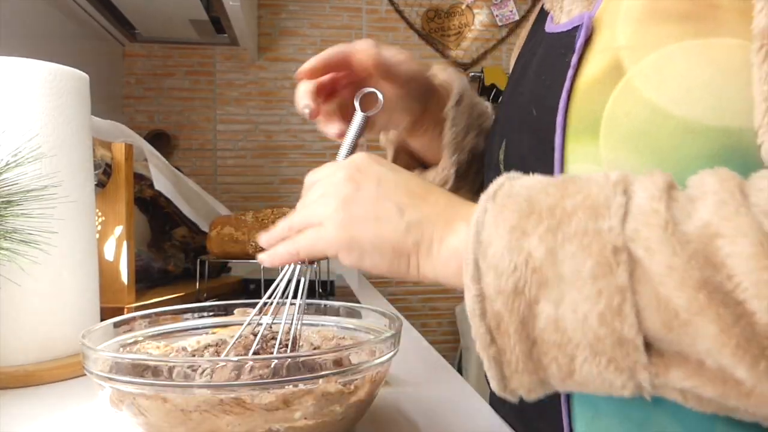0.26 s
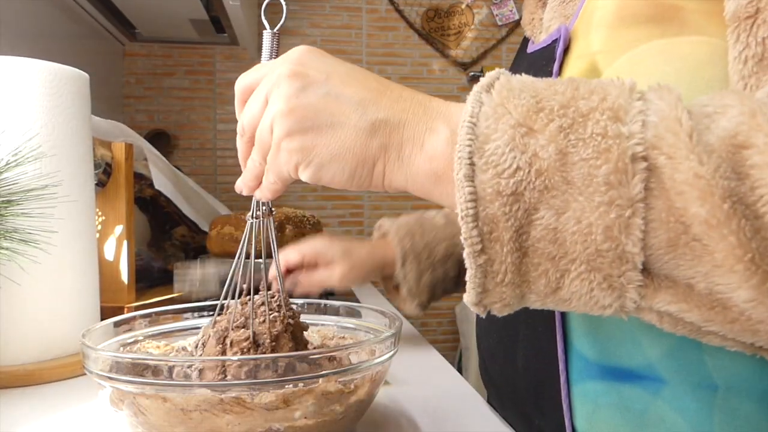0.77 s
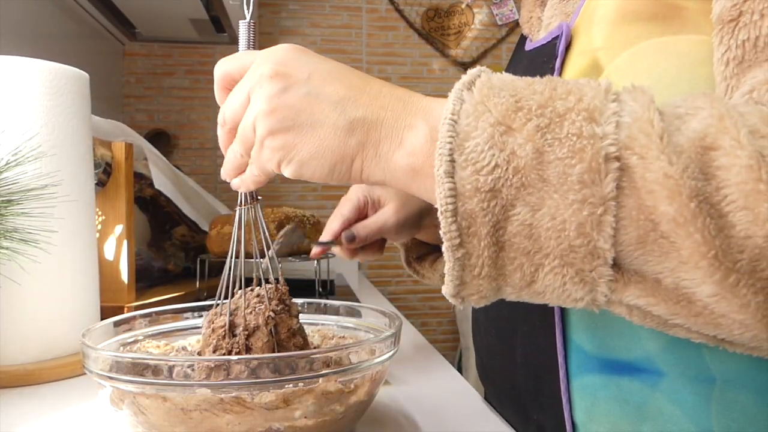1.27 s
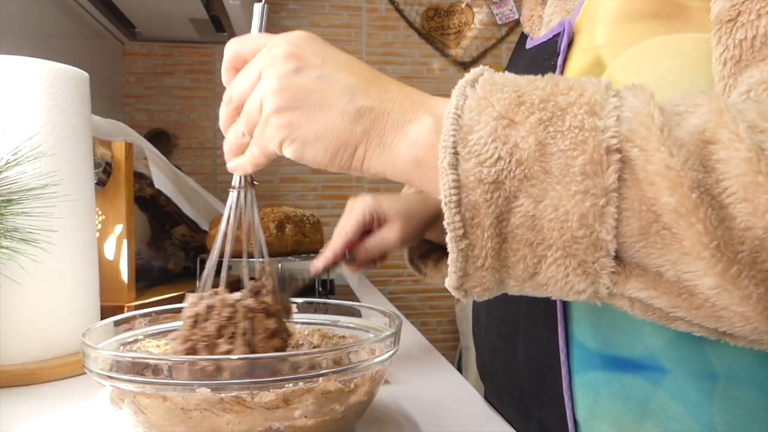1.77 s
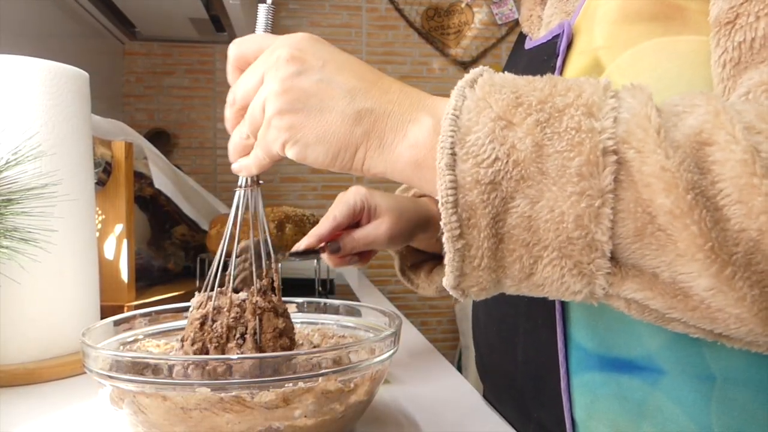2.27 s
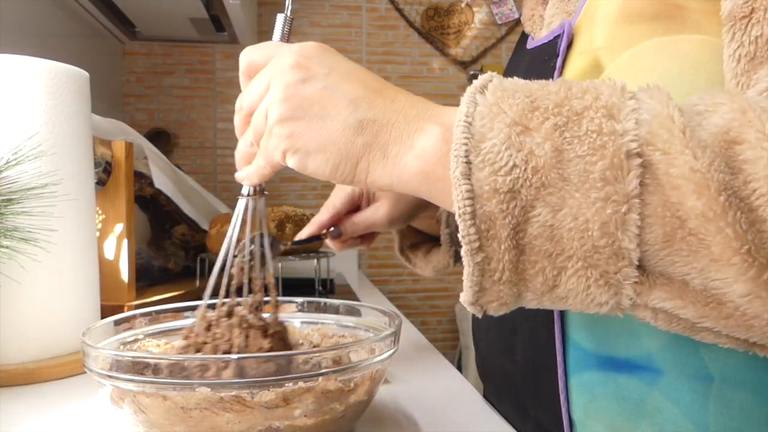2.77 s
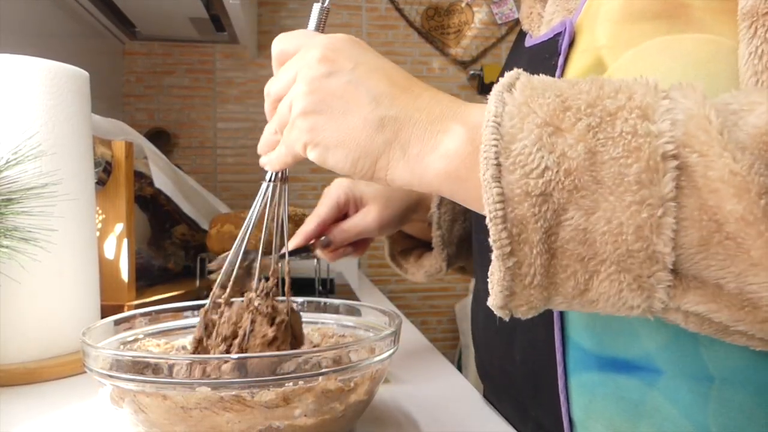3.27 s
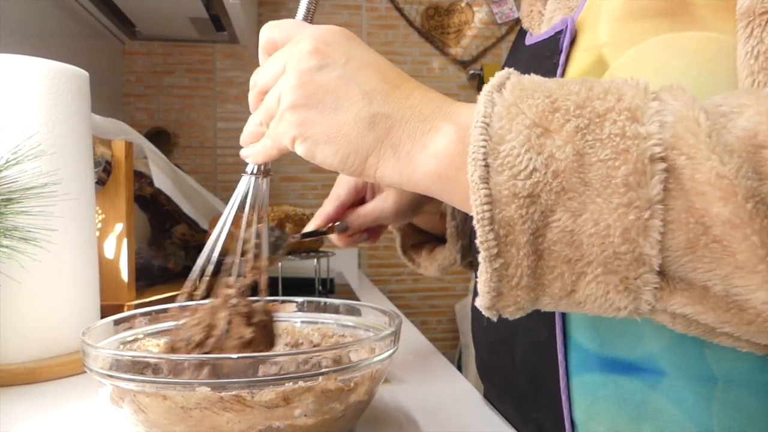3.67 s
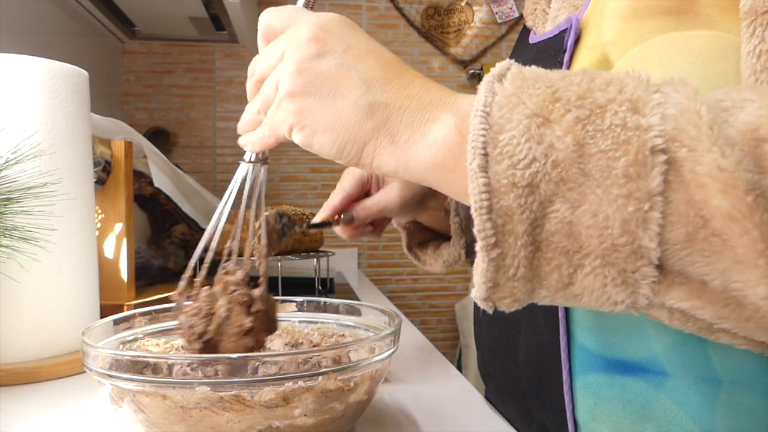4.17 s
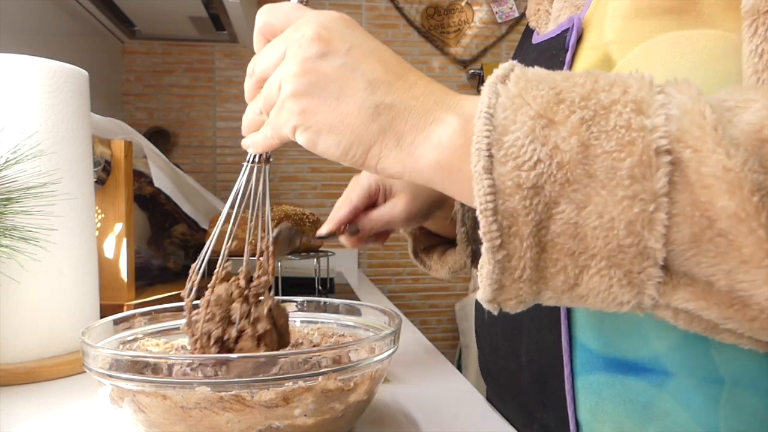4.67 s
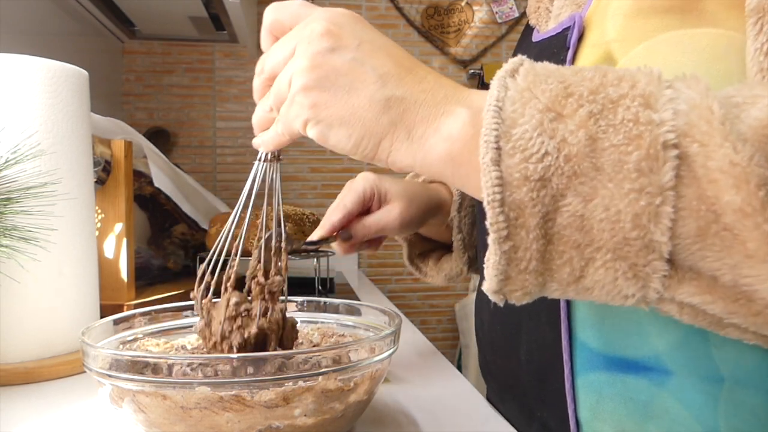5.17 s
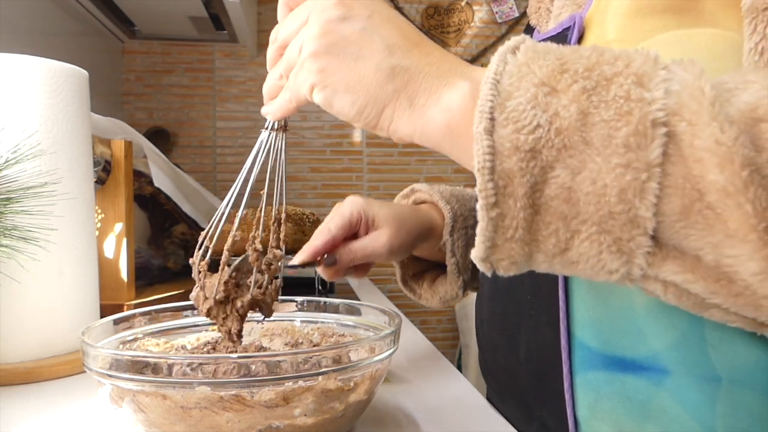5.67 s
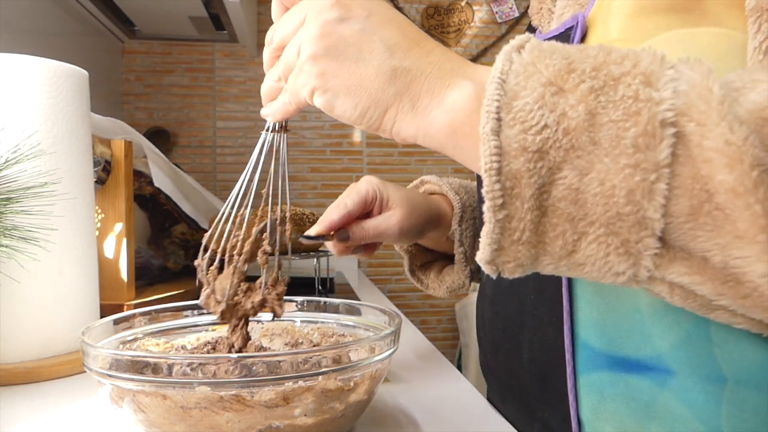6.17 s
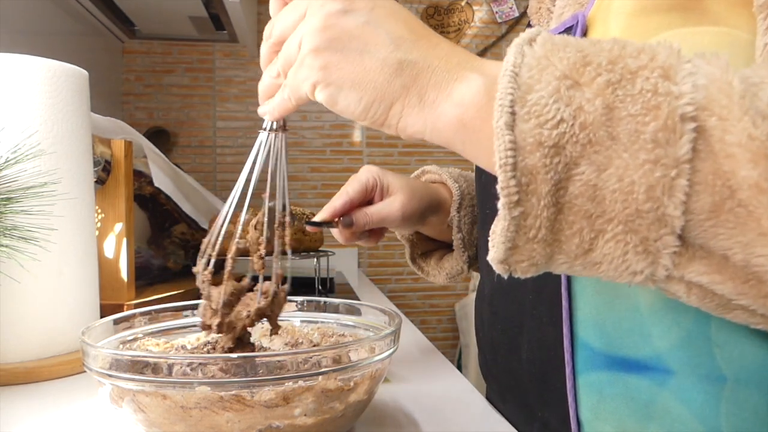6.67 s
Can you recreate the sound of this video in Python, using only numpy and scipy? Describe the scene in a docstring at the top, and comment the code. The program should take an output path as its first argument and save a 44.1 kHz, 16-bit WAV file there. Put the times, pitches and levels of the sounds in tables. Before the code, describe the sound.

A spoon scrapes thick batter off a wire whisk with light metallic ticks and one loud clink on a glass bowl, over a faint fan.

```python
"""Scraping batter off a whisk

In a small tiled kitchen, a spoon is picked up and works thick batter off a wire whisk.
The wires tick and scrape, the glass bowl bumps the counter, and once steel strikes the glass
with a loud clink. A fan hums behind it all, the walls echo, and a limiter holds the clink down."""
import sys
import numpy as np
from scipy import signal
from scipy.fft import rfft, irfft, next_fast_len
from scipy.io import wavfile
from scipy.ndimage import uniform_filter1d, minimum_filter1d, map_coordinates

SR = 44100
rng = np.random.default_rng(int(sys.argv[2]) if len(sys.argv) > 2 else 0)


def to_wav(sig):
    """Store sig (one row per channel, or 1-D mono) as 16-bit WAV at the path in sys.argv[1].

    Samples outside -1..1 are clipped; the rate is SR.
    """
    pcm = np.clip(np.atleast_2d(sig), -1, 1) * 32767
    pcm = np.round(pcm).astype(np.int16)
    wavfile.write(sys.argv[1], SR, pcm.T)  # frames by channels


N = 304731


def amp(db):
    """Turn decibels (dB) into a number to multiply a sound by."""
    return 10 ** (np.asarray(db) / 20)


def unit(x):
    """Scale a sound so that its average strength (rms) is 1."""
    return x / np.sqrt(np.mean(x ** 2) + 1e-20)


def along(points, hz):
    """Read between the rows of a (Hz, value) table, on a scale of pitch."""
    pitches, values = np.transpose(points)
    return np.interp(np.log(hz + 1), np.log(pitches + 1), values)


def peaks(modes, hz):
    """Level in dB of resonances, the pitches a thing rings at, each given as (Hz, width in Hz, dB)."""
    power = sum(np.abs(amp(2 * db) - 1) / (1 + (2 * (hz - centre) / width) ** 2)
                for centre, width, db in modes)
    return 10 * np.log10(1 + power)


def wobble(rate):
    """A smooth curve through `rate` random values a second."""
    return map_coordinates(rng.standard_normal(N // 100), [np.arange(N) * rate / SR], mode="wrap")


def filtered(x, response):
    """Multiply each frequency in a sound by response(hz)."""
    size = next_fast_len(N + SR // 2)
    return irfft(rfft(x, size) * response(np.fft.rfftfreq(size, 1 / SR)), size)[..., :N]


def struck(level, size=4096):
    """How an object rings after one tap, given its tone as level(hz) in dB."""
    cepstrum = irfft(np.log(amp(level(np.fft.rfftfreq(size, 1 / SR)))))
    cepstrum[1:size // 2] *= 2  # this folding puts all the ringing after the tap
    cepstrum[size // 2 + 1:] = 0
    response = irfft(np.exp(rfft(cepstrum)))
    return response / np.linalg.norm(response)


def add(track, s, sound):
    """Mix a sound into the track at s seconds."""
    part = track[round(s * SR):][:len(sound)]
    part += sound[:len(part)]


def rush(level, likeness):
    """Stereo noise with the tone level(hz) in dB; likeness says how alike the two ears are."""
    turn = lambda hz: np.arccos(np.clip(along(likeness, hz), -1, 1)) / 2
    shares = lambda hz: amp(level(hz)) * [np.cos(turn(hz)), np.sin(turn(hz))]
    mid, side = filtered(rng.standard_normal((2, N)), shares)
    return unit(np.array([mid + side, mid - side]))


def whine(centre_hz=2550, width_hz=50, db=-72.5, flicker_db=3.0):
    """A thin, faint whine wavers in the background."""
    band = rush(lambda hz: -20 * np.log10(1 + ((hz - centre_hz) / width_hz) ** 2), [(2000, 0.78)])
    return amp(db + flicker_db * wobble(16)) * band


# The motor's hum. Each row: pitch in Hz, level in dB, phase gap between the ears in radians.
MOTOR_TONES = [(48.6, -73.5, 1.5), (194.5, -65.5, 1.2), (244, -69, 1.2), (275, -69.5, .8),
               (472, -50.8, 1.25), (489, -68, .8), (602, -73, .8)]
# The tone of the rushing air and of the hiss. Each row: frequency in Hz, relative level in dB.
AIR_TONE = [(20, -28.5), (65, -20.5), (95, -4.5), (130, 2), (260, 2), (370, -4), (500, -2.5), (690, -4),
            (800, -1.5), (980, -3.5), (1070, -10.5), (1180, -6), (1310, -7), (1420, -14.5), (2450, -16.5),
            (5000, -50.5)]
HISS_TONE = [(200, -1), (1500, -13.5), (2200, 1.5), (2480, -8.5), (2750, 0), (3700, -5.5), (5500, -2.5),
             (7400, -5.5), (10000, -2.5), (13000, -5.5), (15700, -9.5)]
# Where the fan's housing rings. Each row: pitch in Hz, width in Hz, boost in dB.
HOUSING_MODES = [(442.4, 43, 9), (758.3, 7.3, 10), (952, 16, 7), (1147, 31, 12.5), (1256, 20, 12),
                 (1290, 20, 11.5)]
# How the air swells and sinks. Each row: time in seconds, level change in dB.
AIR_SWELL = [(0, 0), (1.8, 0.3), (3.8, 0), (5, -0.24), (6.2, -1.9), (6.9, -1.5)]
# How alike the air sounds in both ears. Each row: frequency in Hz, likeness from -1 to 1.
AIR_LIKENESS = [(60, -0.57), (130, -0.35), (290, -0.29), (640, 0.4), (1410, 0.44), (3100, -1), (6820, 0.77),
                (15000, 0.68)]

def fan(air_db=-50.0, hiss_db=-62, drift=0.12):
    """A slightly unsteady motor hums over a thin hiss and a rush of air that rings in the housing."""
    t, hum = np.arange(N) / SR, np.zeros((2, N))
    for hz, db, phase in MOTOR_TONES:
        angle = 2 * np.pi * hz * t + drift * (hz / 472) ** 2 * wobble(15)
        hum += np.sqrt(2) * amp(db + 1.1 * wobble(3.96)) * np.sin([angle + phase / 2, angle - phase / 2])
    swell_db = np.interp(t, *np.transpose(AIR_SWELL))
    air = rush(lambda hz: along(AIR_TONE, hz) + peaks(HOUSING_MODES, hz), AIR_LIKENESS)
    air *= amp(air_db + swell_db + .9 * wobble(4.5))
    hiss = amp(hiss_db) * rush(lambda hz: along(HISS_TONE, hz), [(2000, 0.31), (10000, 0.59)])
    return hum * amp([[-1.3], [1.3]]) + air * amp([[-.6], [.6]]) + hiss  # a little to the right


# Echoes off the counter, tiles and cupboards.
# Each row: delay to the left ear in seconds, delay to the right ear in seconds, relative level in dB.
ECHOES = [(.0012, 0.0014, -14.5), (.007, .007, -3.5), (.0082, .0085, -13), (0.0108, 0.012, -6.5),
          (0.0145, 0.014, -6.5)]
# How long the room rings. Each row: frequency in Hz, seconds to fade by 60 dB.
ROOM_FADE = [(150, 0.7), (1000, 0.75), (2800, 0.6), (4600, 0.54), (9000, 0.39), (15000, 0.28)]

def kitchen(x, walls_db, tail_db, side_db, build_s=0.0007):
    """The sound arrives directly, then as a few hard echoes and a soft tail, much alike in both ears."""
    hz, t, noise = signal.stft(rng.standard_normal((2, SR * 2 // 3)), SR, nperseg=256)
    decay = amp(-60 * t / along(ROOM_FADE, hz)[:, None]) * (1 - np.exp(-t / build_s))
    mid, side = signal.istft(noise * decay, SR, nperseg=256)[1]
    side = amp(side_db) * side
    room = amp(tail_db) * np.array([mid + side, mid - side]) / np.linalg.norm(mid)
    room[:, 0] += 1  # the direct sound
    for left, right, db in ECHOES:
        room[[0, 1], [round(left * SR), round(right * SR)]] += amp(db + walls_db)
    return signal.fftconvolve(x[None], room / np.linalg.norm(room[0]), axes=1)[:, :N]


# The bowl's bumps. Each row: start in seconds, level in dB, added brightness in dB per octave.
BOWL_BUMPS = [(0.486, -26, 0.5), (0.497, -32, 0.5), (2.411, -36, -4.5), (2.451, -45.5, -6.5),
              (3.063, -16.5, 6.5)]
# The counter's tone. Each row: frequency in Hz, relative level in dB.
COUNTER_TONE = [(50, -27.5), (110, -17.5), (170, 1), (270, -1), (350, 5), (480, -4), (700, -5),
                (1050, -5.5), (1600, -21.5), (4000, -28), (12000, -43.5)]

def bumps(fade_s=0.027):
    """The counter takes the bowl's weight with a short thud."""
    out, t = np.zeros(N), np.arange(SR // 8) / SR
    for s, db, tilt in BOWL_BUMPS:
        push = rng.standard_normal(len(t)) * amp(-60 * t / fade_s)
        counter = struck(lambda hz: along(COUNTER_TONE, hz) + tilt * np.log2(1 + hz / 300))
        thud = signal.fftconvolve(push, counter)
        add(out, s, amp(db) * thud / np.abs(thud).max())
    return out


def stroke(rise_s, fall_s, slips_per_s=2500, smooth=0.75):
    """Rubbing is many tiny slips; the pressure peaks in the middle of this half second."""
    t = np.arange(-SR // 4, SR // 4) / SR
    slips = unit(rng.standard_normal(len(t)) * (rng.random(len(t)) < slips_per_s / SR))
    pressure = np.exp(-(t / np.where(t < 0, rise_s, fall_s)) ** 2 / 2)
    return pressure * unit(slips + smooth * rng.standard_normal(len(t)))


# The spoon drags on the counter, first on its scoop, then on its handle.
# Each row: loudest moment in seconds, level in dB, rise in seconds, fall in seconds.
SPOON_DRAGS = [(.532, -35.5, 0.016, 0.0083), (.618, -36.5, 0.034, 0.012)]
# Where it rings. Each row: pitch in Hz, width in Hz, boost in dB on the scoop, then on the handle.
SPOON_MODES = [(1900, 20, 19.5, 0), (2020, 12, 0, 20.5), (2385, 89, 10.5, -1), (3550, 45, 0, 11),
               (3950, 76, -5, 16), (4620, 330, 7, 13), (5560, 46, 4, 14.5), (7060, 200, 7, 16),
               (7900, 150, 3.5, 15.5), (8200, 110, 5, 23), (9200, 150, 11.5, 12), (9830, 94, 5, 20),
               (9980, 160, 19, 18), (12100, 120, 0, 12), (12640, 110, 17.5, 27.5), (13900, 94, 10.5, 20)]

def spoon(low_hz=900, high_hz=14300):
    """Rubbing makes the spoon sing as it is picked up; the part that touches decides which notes ring."""
    out = np.zeros(N)
    band = lambda hz: -10 * np.log10((1 + (low_hz / (hz + 20)) ** 2) * (1 + (hz / high_hz) ** 20))
    for part, (s, db, rise, fall) in enumerate(SPOON_DRAGS):
        modes = [(hz, width, levels[part]) for hz, width, *levels in SPOON_MODES]
        friction = stroke(rise, fall)
        steel = struck(lambda hz: peaks(modes, hz) + band(hz))
        add(out, s - len(friction) / SR / 2, amp(db) * signal.fftconvolve(friction, steel))
    return out


# The tone of the whisk's wires. Each row: frequency in Hz, relative level in dB.
WIRE_TONE = [(300, -36), (1500, -11.5), (2700, -6), (4100, -8), (5300, -1.5), (6800, -1), (8100, -1),
             (11000, -0.5), (12700, 1.5), (14200, -2), (15600, -4)]

def wire(body_db, uneven_db, ring_hz=5430, ring_db=1.5, width_hz=260, body_hz=4200):
    """Each spot on a wire rings in its own way; a firm touch adds body, the lower part of the tone."""
    ripples = rng.standard_normal(size=80)
    uneven = lambda hz: uneven_db * np.interp(hz, np.linspace(0, SR / 2, len(ripples)), ripples)
    ring = lambda hz: ring_db / (1 + ((hz - ring_hz) / width_hz) ** 2)
    body = lambda hz: body_db / (1 + (hz / body_hz) ** 6)
    return struck(lambda hz: along(WIRE_TONE, hz) + uneven(hz) + ring(hz) + body(hz))


# Quick spoon strokes. Each row: loudest moment in seconds, level in dB, rise in seconds, body in dB.
BATTER_STROKES = [(2.293, -41.5, 0.014, -5), (2.576, -45.5, .024, 2.5), (3.029, -42, .035, 8.5),
                  (3.245, -42.5, .018, 9), (3.416, -40, .012, -2.5), (3.97, -54, .014, 10),
                  (4.217, -40.5, .016, -14.5), (4.258, -42, .01, -6.5), (4.605, -51.5, .055, 4),
                  (4.781, -45.5, .012, -2.5), (5.007, -45.5, .014, 3.5), (5.263, -49.5, .026, 1),
                  (5.378, -51, .035, 2.5), (5.794, -47, .018, -2.5), (6.17, -53.5, .035, -12),
                  (6.245, -35.5, .016, -2), (6.39, -50, .039, 3), (6.797, -40.5, .017, -0.5)]

def scrapes():
    """Each stroke through the batter crosses many wires, so their ringing blends."""
    out = np.zeros(N)
    for s, db, rise, body_db in BATTER_STROKES:
        friction = stroke(rise, fall_s=0.0087)
        wires = wire(body_db, uneven_db=1.5)
        add(out, s - len(friction) / SR / 2, amp(db) * signal.fftconvolve(friction, wires))
    return out


# The spoon snaps onto a wire, then slides along it.
# Each row: start in seconds, level in dB, body in dB, ping in dB, length of the slide in seconds.
WIRE_SNAPS = [(1.123, -49.5, -6, 12, .01), (1.363, -32, -1.5, 15.5, 0.39), (1.9192, -25, -1, -7, .04),
              (2.261, -34.5, -10, -2, .25), (2.82, -43, -14, -3, .01), (2.8719, -26, -1.5, -2, .2),
              (3.6307, -25.5, -4.5, -12, .02), (4.378, -40.5, 16, -4, .07), (4.8484, -33.5, 1.5, -3, .18),
              (6.221, -26.5, 3, 3, .12)]

def ticks(snap_fade_s=0.023, chatter_db=-17, chatter_fade_s=0.29, ping_hz=7820):
    """A wire slips free with a snap and chatters briefly; if left free to ring, it pings."""
    out, t = np.zeros(N), np.arange(SR // 8) / SR
    for s, db, body_db, ping_db, _ in WIRE_SNAPS:
        fade = amp(-60 * t / snap_fade_s) + amp(chatter_db - 60 * t / chatter_fade_s)
        snap = rng.standard_normal(len(t)) * fade
        ring = wire(body_db, uneven_db=1.2, ring_hz=ping_hz, ring_db=ping_db)
        add(out, s, amp(db - 2.5) * signal.fftconvolve(snap, ring))
    return out


def slides(db=-55.5):
    """After each snap the spoon runs on along the wire with a faint hiss, strongest halfway."""
    out = np.zeros(N)
    for s, *_, length in WIRE_SNAPS:
        friction = stroke(rise_s=.33 * length, fall_s=.36 * length)
        ring = wire(body_db=6, uneven_db=0.8)
        add(out, s + length / 2 - len(friction) / SR / 2, amp(db) * signal.fftconvolve(friction, ring))
    return out


def crackle(pops_per_s=35, db=-58, spread_db=3, linger_s=0.046):
    """Threads of batter part with tiny sticky pops, around each stroke and at the end of each slide."""
    t = np.arange(SR) / SR
    times = [s for s, *_ in BATTER_STROKES] + [s + length for s, *_, length in WIRE_SNAPS]
    partings = np.bincount([round(s * SR) for s in times], minlength=N)
    activity = signal.fftconvolve(partings, np.exp(-((t - .5) / linger_s) ** 2), "same")
    sizes = amp(db + spread_db * np.minimum(rng.exponential(size=N), 2))
    popping = rng.random(N) < activity * pops_per_s / SR
    burst = rng.standard_normal(size=60)
    pop = signal.fftconvolve(burst, wire(body_db=0, uneven_db=-4.0, ring_hz=5500, ring_db=2))
    return signal.fftconvolve(sizes * popping, pop)[:N]


# The glass bowl's notes. Each row: pitch in Hz, relative level in dB, seconds to fade by 60 dB.
GLASS_NOTES = [(2097, -26, .22), (3257, -22, .07), (4534, -19, .06), (4586, -12, .12), (4645, -16, .07),
               (4680, -15, .05), (6105, -27, .13), (1179, -37, .2), (2119, -32, .2), (2760, -30, .12),
               (2903, -29, .17), (2985, -31, .15), (3346, -28, .14), (5860, -29, .07)]
# The tone of the hit itself. Each row: frequency in Hz, relative level in dB.
CRACK_TONE = [(50, -34), (115, -14), (220, -12), (350, -18), (1300, -13.5), (2350, -14), (3050, -5.5),
              (4050, -10.5), (4650, -6), (5250, -17.5), (5950, -2), (6700, -30.5), (8400, -9.5),
              (11600, -22.5), (12700, -16), (15500, -31.5)]

def clink(start_s=3.0618, crack_db=14, ring_db=2, attack_s=0.00052):
    """Steel hits glass with a hard crack; the bowl rings, and notes close in pitch make it shimmer."""
    out, t = np.zeros(N), np.arange(SR // 2) / SR
    ring = sum(amp(db - 60 * t / fade_s) * np.sin(2 * np.pi * (hz * t + rng.random()))
               for hz, db, fade_s in GLASS_NOTES)
    add(out, start_s, amp(ring_db) * ring * (1 - np.exp(-t / attack_s)))
    burst = rng.standard_normal(len(t)) * amp(-60 * t / 0.011)
    rasp = irfft(np.exp(1j * np.angle(rfft(burst))))[:SR // 100]  # equally strong at all pitches
    crack = signal.fftconvolve(rasp, struck(lambda hz: along(CRACK_TONE, hz)))
    add(out, start_s, amp(crack_db) * crack)
    return out


def scene():
    """Whisk, spoon and bowl sound in the kitchen, in front of the fan."""
    handling = scrapes() + ticks() + slides() + crackle() + spoon() + bumps()
    handling = kitchen(handling, walls_db=-2.5, tail_db=-1.5, side_db=-11)
    glass = kitchen(clink(), walls_db=-15, tail_db=-5.5, side_db=-10.5)
    glass *= amp([[.9], [-.9]])  # a little to the left
    return handling + glass + fan() + whine()


def record(dry, ceiling=.88, release_s=0.1, window_samples=25, top_hz=16000):
    """A limiter turns down just before a loud peak and lets go slowly; the highest treble is cut off."""
    t = np.arange(N) / SR
    excess = np.log(np.maximum(np.abs(dry).max(axis=0) / ceiling, 1)) + 1e-12
    held = np.exp(np.maximum.accumulate(np.log(excess) + t / release_s) - t / release_s)
    gain = uniform_filter1d(minimum_filter1d(np.exp(-held), window_samples), window_samples)
    return filtered(dry * gain, lambda hz: hz < top_hz)


dry = scene()
out = record(dry)
to_wav(out)
```